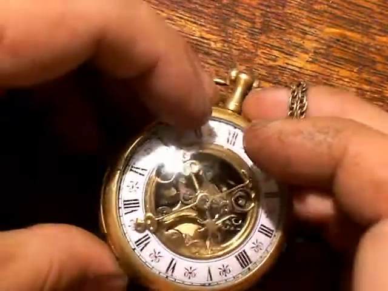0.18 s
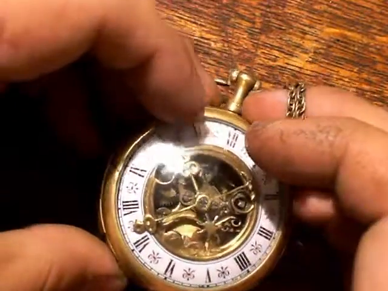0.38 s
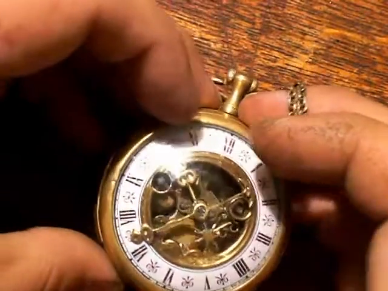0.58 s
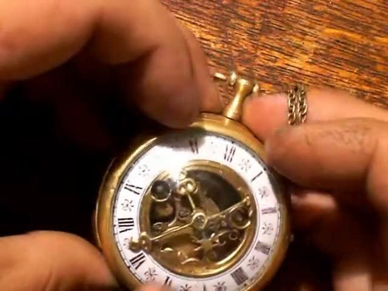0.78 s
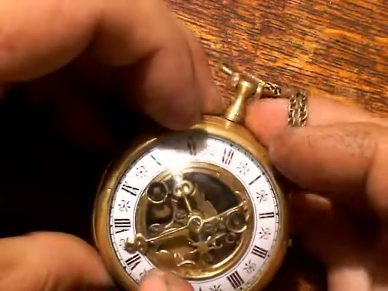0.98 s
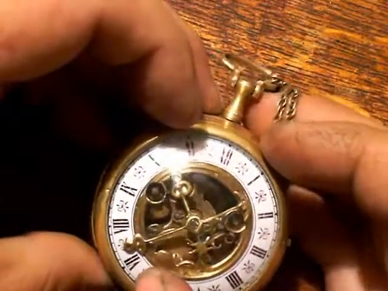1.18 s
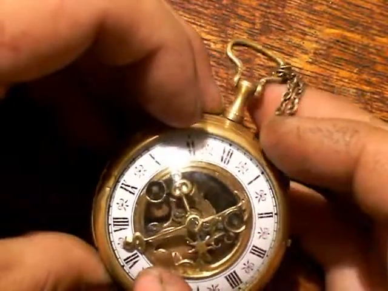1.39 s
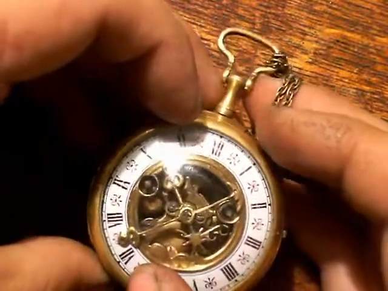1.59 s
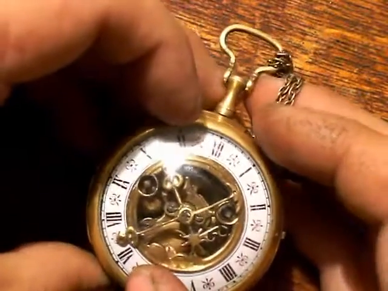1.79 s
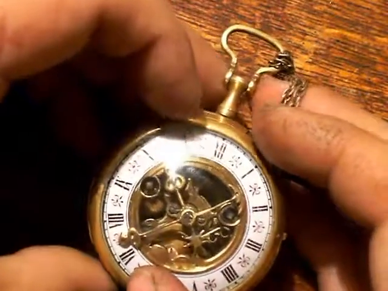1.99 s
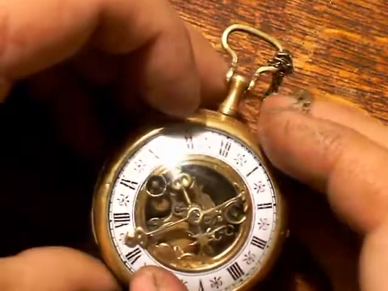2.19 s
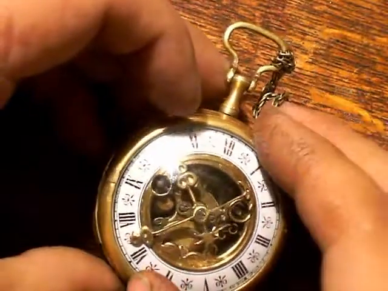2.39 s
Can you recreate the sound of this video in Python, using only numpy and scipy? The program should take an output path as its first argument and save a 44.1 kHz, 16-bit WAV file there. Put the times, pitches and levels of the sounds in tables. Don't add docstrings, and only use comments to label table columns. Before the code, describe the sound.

Close up over steady low hiss, one hard metallic click of a brass watch case, then gentle rocking knocks on a wooden table, a brief scrape, finger rubbing and sparse chain ticks, in a small room.

```python
import sys
import numpy as np
from scipy import signal
from scipy.io import wavfile

SR = 44100
rng = np.random.default_rng(int(sys.argv[2]) if len(sys.argv) > 2 else 0)


def natural_amplitude(level_db):
    exponent = np.asarray(level_db, float) / 20
    return 10 ** exponent


def dump_mix(stems):
    frames = np.atleast_2d(stems).T
    limited = np.clip(frames, -1, 1)
    pcm = np.round(limited * 32767).astype(np.int16)
    wavfile.write(sys.argv[1], SR, pcm)


N = 110250


def rms_one(x):
    return x / np.sqrt(np.mean(x ** 2) + 1e-20)


def peak_one(x):
    return x / np.abs(x).max()


def at_hz(points, hz, axis=1):
    points = np.array(points)
    return np.interp(np.log(hz), np.log(points[:, 0]), points[:, axis])


def in_time(rows):
    return np.interp(np.arange(N) / SR, *np.transpose(rows))


def add(out, s, sound):
    i = int(s * SR)
    out[i:i + len(sound)] += sound[:N - i]


def drift(rate_hz):
    r = np.exp(-80 * np.pi * rate_hz / SR)
    draws = rng.standard_normal(N // 40 + 2002)
    slow = signal.lfilter([1], [1, -2 * r, r * r], draws)[2000:]
    return np.interp(np.arange(N) / 40, np.arange(len(slow)), rms_one(slow))


def ring(clicks, hz, t60):
    r = natural_amplitude(-60 / (t60 * SR))
    w = 2 * np.pi * min(hz, .45 * SR) / SR
    return signal.lfilter([0, np.sin(w)], [1, -2 * r * np.cos(w), r * r], clicks + 1e-18)


def soften(x, hz):
    r = np.exp(-2 * np.pi * hz / SR)
    return signal.lfilter([(1 - r) ** 2], [1, -2 * r, r * r], x)


def cut_lows(x, hz):
    return signal.sosfilt(signal.butter(3, hz, "high", fs=SR, output="sos"), x)


def chatter(spread_s, count):
    clicks = np.zeros(4096)
    draw = rng.random((count, 2))
    late = np.append(0, draw[1:, 0] ** 2)
    heights = np.exp(-late) * np.sign(draw[:, 1] - .5) * (.5 + draw[:, 1])
    np.add.at(clicks, (2 * late * spread_s * SR).astype(int), heights)
    return clicks


def bands(size):
    edges = 25 * 2 ** np.arange(0, 8.6, .5)
    white = rng.standard_normal((2, size))
    for k, (low, high) in enumerate(zip(edges, edges[1:])):
        band = signal.butter(2, [low, high], "band", fs=SR, output="sos")
        yield np.sqrt(low * high), signal.sosfilt(band, white[k % 2])


def noise(spectrum, patchy_db, rate_hz):
    together = drift(rate_hz)
    total = np.zeros(N)
    for hz, band in bands(N):
        flicker_db = patchy_db * (together + drift(rate_hz))
        total += natural_amplitude(at_hz(spectrum, hz) + flicker_db) * band
    return rms_one(total)


# (time [s], level [dB])
SNAP_CONTACTS = [(.20005, -17), (.20090, -18), (.20255, -16), (.20505, -21), (.1975, -44)]
# (frequency [Hz], level [dB], t60 [s])
CASE_MODES = [(270, -8, .035), (340, -4, 0.039), (460, -6, 0.018), (667, -8.5, 0.037), (880, -16.5, 0.048),
              (1030, -14.5, .025), (1142, 1, 0.01), (1300, -5, .02), (1630, -7, .02), (2070, -20, 0.029),
              (2370, -31, .02), (3350, -32.5, .012), (5030, -22.5, 0.0058), (6750, -16, 0.011)]
SNAP_SOFT_HZ = 6000


def snap(count, damping):
    clicks = np.zeros(N)
    for s, db in SNAP_CONTACTS[:count]:
        clicks[int(s * SR)] = natural_amplitude(db)
    push = soften(clicks, SNAP_SOFT_HZ)
    sound = sum(natural_amplitude(db) * ring(push, hz, t60 / damping) for hz, db, t60 in CASE_MODES)
    return cut_lows(cut_lows(sound, 230), 230)


# (time [s], peak level [dB], pitch [Hz])
WOOD_KNOCKS = [(0.127, -53.5, 196), (0.562, -50.5, 208), (0.615, -50.5, 371), (0.644, -42.5, 224),
               (0.694, -52, 250), (0.722, -60, 260), (0.774, -53.5, 322), (0.817, -49, 336),
               (0.826, -50.5, 247), (0.895, -36.5, 345), (0.934, -51, 345), (0.982, -46, 318),
               (1, -39, 364), (1.023, -51.5, 340), (1.085, -47, 284), (1.104, -59, 238),
               (1.213, -55.5, 403), (1.553, -52.5, 324), (2.278, -59, 375), (2.424, -48, 357)]
KNOCK_T60_S, KNOCK_SOFT_HZ, KNOCK_DB, OVERTONE_DB = .03, 1100, 0.5, -6


def knocks():
    out = np.zeros(N)
    touch = soften(np.abs(chatter(0, count=1)), KNOCK_SOFT_HZ)
    for s, db, hz in WOOD_KNOCKS:
        low = ring(touch, hz, KNOCK_T60_S)
        overtone = ring(touch, 3.3 * hz, 0.014)
        add(out, s, natural_amplitude(db + KNOCK_DB) * peak_one(low + natural_amplitude(OVERTONE_DB) * overtone))
    return out


# (time [s], peak level [dB], pitch [Hz])
LOOSE_RINGS = [(0.5743, -53, 1600), (0.596, -57, 1740), (0.618, -56, 1640), (0.6436, -52.5, 1650),
               (0.6993, -48, 1650), (0.7406, -71, 1630), (0.7746, -56, 1740), (0.7975, -57, 1690),
               (0.8332, -55, 1716), (0.897, -51, 1706), (0.983, -57, 1665), (1.0974, -45.5, 1706),
               (1.1115, -42, 1716)]
RING_T60_S, RING_SHAKE_S, RING_DB = 0.041, .004, -2


def loose_part():
    out = np.zeros(N)
    for s, db, hz in LOOSE_RINGS:
        shake = ring(chatter(RING_SHAKE_S, count=8), hz, 0.0059)
        add(out, s, natural_amplitude(db + RING_DB) * peak_one(ring(shake, hz, RING_T60_S)))
    return out


# (time [s], peak level [dB], brightest pitch [Hz], breadth [octaves])
LINK_TICKS = [(0.105, -39.5, 4560, 0.85), (0.116, -39, 6000, 0.13), (0.452, -48.5, 5870, 0.21),
              (.698, -46.5, 6800, 0.2), (.796, -40, 5700, 0.26), (0.893, -40, 3950, 2.7),
              (0.983, -53, 2700, .5), (1.001, -48, 6860, 0.26), (1.147, -50, 5800, .3),
              (1.1835, -40, 6800, 0.39), (1.344, -45, 4500, 0.3), (1.593, -39, 5880, 0.37),
              (1.597, -40, 4450, 0.46), (1.609, -47, 5000, 0.33), (2.040, -43, 6740, 0.36),
              (2.0715, -45, 3500, 2.3), (2.2265, -37, 5460, 0.53), (2.241, -42, 7100, 0.086),
              (2.2907, -41.5, 5030, 0.4), (2.306, -43, 7000, 0.16), (2.3229, -33, 5300, 0.52),
              (2.4461, -38.5, 6000, 0.48)]
LINK_T60_S, CHATTER_S, TICK_DB, LINK_LOW_HZ = .013, 0.0033, -1, 1500


def chain():
    out = np.zeros(N)
    for s, db, brightest_hz, breadth in LINK_TICKS:
        links = np.geomspace(1800, 7100, 16) * rng.uniform(.96, 1.04, 16)
        octaves_off = np.log2(links / brightest_hz)
        weights = np.exp(-.5 * (octaves_off / max(breadth, .05)) ** 2)
        tick = sum(w * ring(chatter(CHATTER_S, count=7), hz, LINK_T60_S) for hz, w in zip(links, weights))
        add(out, s, natural_amplitude(db + TICK_DB) * peak_one(cut_lows(tick, LINK_LOW_HZ)))
    return out


# (frequency [Hz], level [dB])
SCRAPE_COLOUR = [(230, -10.5), (500, -29), (1000, -18), (2700, -7.5), (4400, -2), (5200, -12), (6500, 8)]
SCRAPE_START_S, SCRAPE_LENGTH_S, SCRAPE_DB, SLIPS_PER_S = 1.092, .027, -32, 9000


def bow():
    t = np.arange(4096) / SR
    draw = rng.random((3, 4096))
    arch = np.sin(np.pi * np.clip(t / SCRAPE_LENGTH_S, 0, 1))
    stroke = np.maximum(arch, 0) ** .5 * (t < SCRAPE_LENGTH_S)
    slips = (draw[0] < SLIPS_PER_S / SR) * (2 * draw[1] - 1) * stroke
    spot = (draw[2] * 6).astype(int)
    sound = np.zeros(4096)
    for k, hz in enumerate(np.geomspace(220, 7000, 18)):
        sound += natural_amplitude(at_hz(SCRAPE_COLOUR, hz)) * ring(slips * (spot == k % 6), hz, 22 / hz)
    out = np.zeros(N)
    add(out, SCRAPE_START_S, natural_amplitude(SCRAPE_DB) * peak_one(sound))
    return out


# (time [s], level [dB])
BUZZ_LEVEL = [(.5, -92), (.56, -72), (.86, -73), (.95, -87), (1.09, -76), (1.113, -56), (1.14, -97)]
BUZZ_HZ = (1650, 1740)


def buzz():
    modes = sum(ring(ring(rng.standard_normal(N), hz, .03), hz, .05) for hz in BUZZ_HZ)
    return natural_amplitude(in_time(BUZZ_LEVEL) + 3 * drift(25)) * rms_one(modes)


THUMP_S, THUMP_DB = (.202, 1.097), (-46.5, -52.5)
THUMP_HZ, THUMP_T60_S = 109, .12


def thump():
    out = np.zeros(N)
    for s, db in zip(THUMP_S, THUMP_DB):
        push = cut_lows(soften(np.abs(chatter(0, count=1)), 120), 70)
        add(out, s, natural_amplitude(db) * peak_one(ring(push, THUMP_HZ, THUMP_T60_S)))
    return out


# (time [s], level [dB])
HAND_MOTION = [
    [(0.0, -62), (0.17, -59)],
    [(0.45, -56.5), (1.06, -57.5), (1.36, -61), (2.09, -63), (2.5, -59)],
]
# (frequency [Hz], density [dB per Hz])
RUB_COLOUR = [(60, -13.5), (141, -10.5), (230, -2), (346, 1), (600, -2), (1500, -4), (3000, -36.5),
              (7000, -29.5)]
RUB_DB = -7


def fingers():
    level_db = in_time(HAND_MOTION[0] + HAND_MOTION[1]) + RUB_DB
    return natural_amplitude(level_db) * noise(RUB_COLOUR, patchy_db=1.54, rate_hz=54)


# (time [s], level [dB])
RUSTLE_LEVEL = [(0, -72), (.5, -67.5), (.8, -60), (1.0, -73), (1.32, -63), (1.38, -84), (2.19, -73),
                (2.23, -60), (2.36, -60), (2.5, -68.5)]
# (frequency [Hz], density [dB per Hz])
RUSTLE_COLOUR = [(1500, -34), (3000, 9), (5000, -13.5), (7000, 3)]


def rustle():
    return natural_amplitude(in_time(RUSTLE_LEVEL)) * noise(RUSTLE_COLOUR, patchy_db=2.5, rate_hz=16)


# (frequency [Hz], t60 [s], level [dB])
ROOM_DECAY = [(100, 0.24, -26.5), (200, 0.16, -33.5), (325, 0.26, -35.5), (536, .28, -35.5),
              (939, 0.35, -35), (1440, 0.28, -38.5), (2370, 0.24, -41.5), (4800, 0.089, -34)]
ROOM_DELAY_S = 0.0016


def room(x):
    t = np.arange(SR // 2) / SR
    tail = np.zeros(SR // 2)
    for hz, band in bands(SR // 2):
        fall_db = 60 * t / at_hz(ROOM_DECAY, hz)
        tail += natural_amplitude(at_hz(ROOM_DECAY, hz, axis=2) - fall_db) * band
    onset = np.clip(t / ROOM_DELAY_S - 1, 0, 1)
    return signal.fftconvolve(x, tail * onset)[:N]


# (frequency [Hz], density [dB per Hz])
HISS_COLOUR = [(25, -16.5), (70, -4.5), (180, -2), (350, -3), (700, -9), (2000, -12.5), (4500, -15),
               (7000, -13.5)]
HISS_DB = -60


def hiss():
    return natural_amplitude(HISS_DB) * noise(HISS_COLOUR, patchy_db=0.41, rate_hz=4.4)


SNAP_DB, ECHO_DB, MIC_LOW_HZ = 1.5, 10.5, 185


def scene():
    touches = cut_lows(knocks() + loose_part() + chain() + bow(), MIC_LOW_HZ)
    small = touches + buzz() + thump()
    direct = natural_amplitude(SNAP_DB) * snap(count=5, damping=1)
    echoes = room(small + natural_amplitude(ECHO_DB) * snap(count=1, damping=1.75))
    return (direct + small + echoes + fingers() + rustle() + hiss())[None]


def roll_off(x):
    return signal.sosfilt(signal.butter(12, 7530, fs=SR, output="sos"), x)


def record(dry):
    steep = signal.cheby2(24, 85, 7400, fs=SR, output="sos")
    mix = signal.sosfilt(steep, dry)
    return roll_off(mix)


dry = scene()
out = record(dry)
dump_mix(out)
```